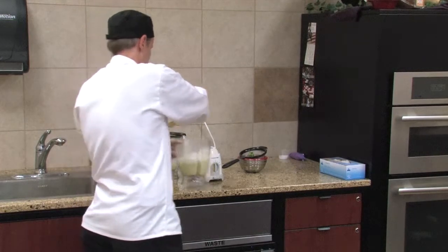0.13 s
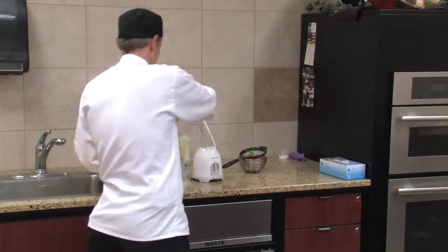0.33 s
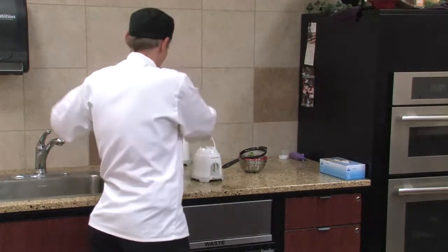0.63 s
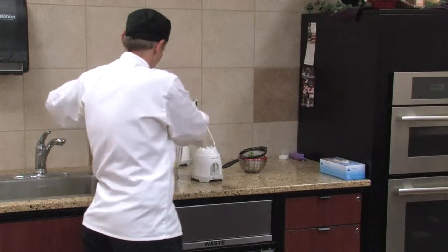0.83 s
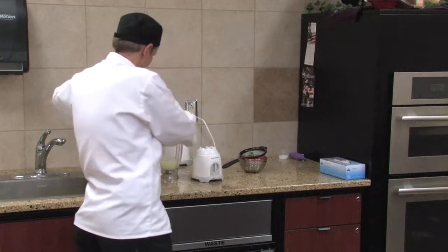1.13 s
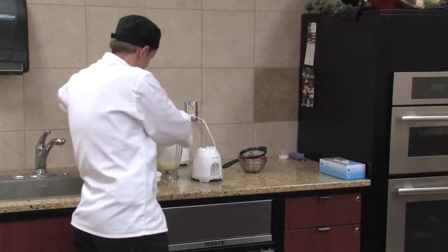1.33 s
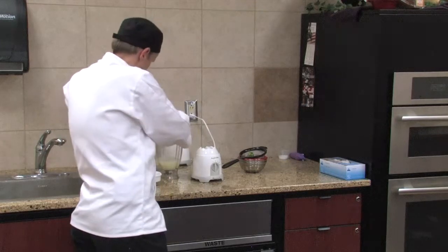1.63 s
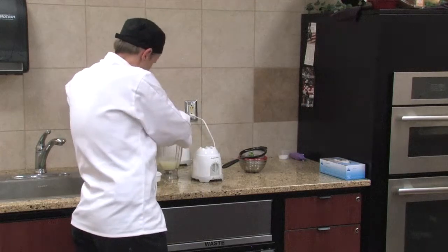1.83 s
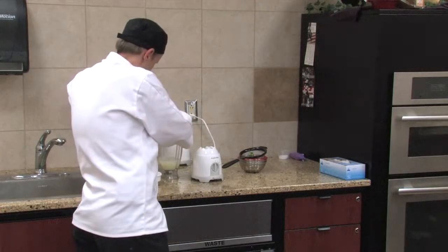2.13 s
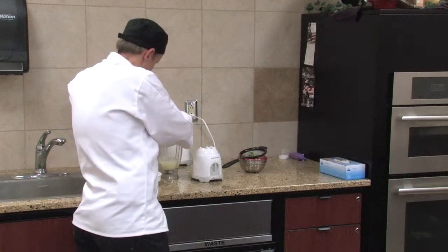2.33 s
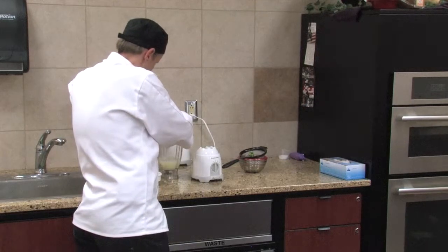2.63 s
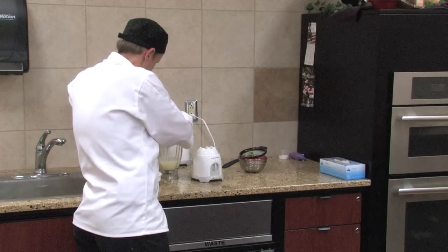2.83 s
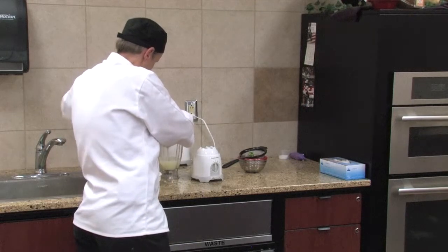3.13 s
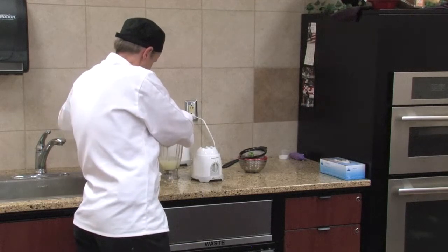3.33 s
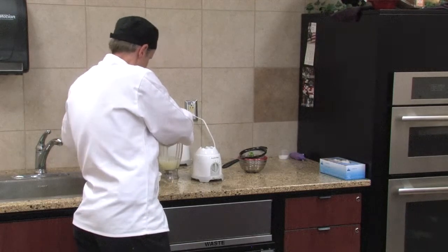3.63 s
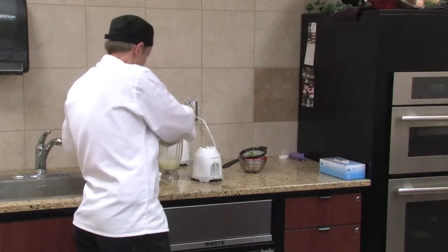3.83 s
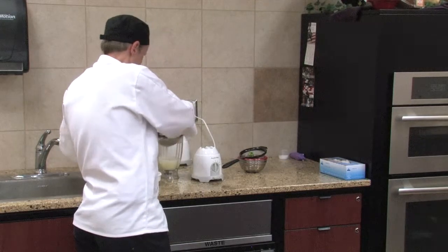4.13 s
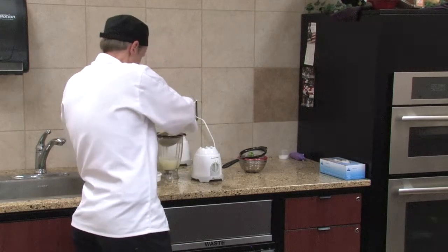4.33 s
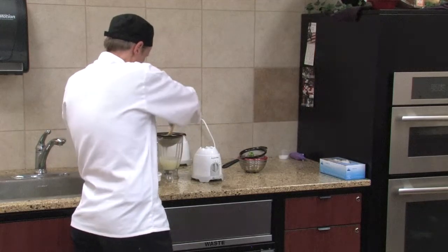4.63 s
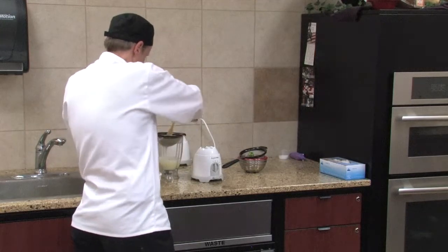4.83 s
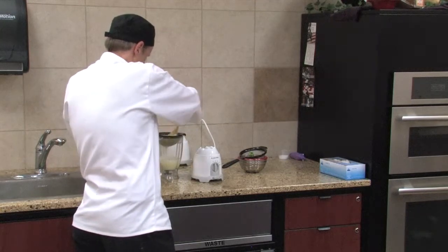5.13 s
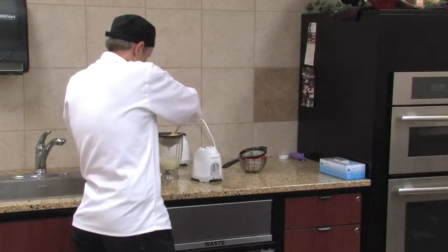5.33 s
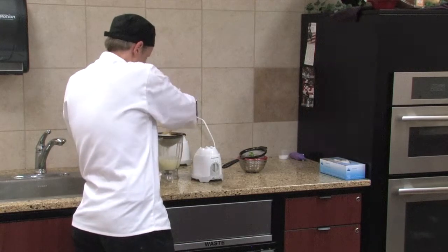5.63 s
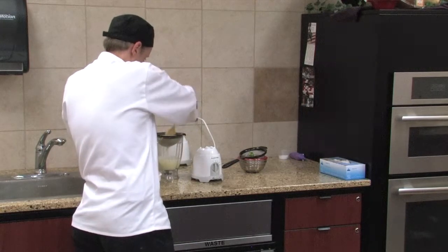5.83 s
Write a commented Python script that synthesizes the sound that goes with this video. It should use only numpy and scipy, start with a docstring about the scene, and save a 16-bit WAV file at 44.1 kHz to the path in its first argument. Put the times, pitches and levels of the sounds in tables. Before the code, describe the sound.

A small, hard kitchen with steady low ventilation and faint mains-like hum, heard from a few steps away. A faint wet rub and a small plop open it, near 0.15 s. From 0.66 to 1.0 s a glass jar knocks hollowly in an uneven, quick cluster, with one brighter click near 0.9. At 1.7 pulpy liquid hits mesh with fine crackle and wet snaps; from about 2.2 juice gurgles into the jar, its hollow note sinking, with plops until 2.8, then it dies away. A weak double knock comes near 3.05 and faint taps around 3.6-3.8. At 3.87 a heavy vessel lands on stone with a full thud and small rocking repeats; at 4.0 the sieve knocks onto the rim, followed by tiny wet ticks near 4.1. Until 6 s the sieve is worked with irregular soft, dull taps, strongest near 4.54, amid wet rubbing and tiny drips. Short tiled reverberation follows each sound.

```python
"""Blender jar and sieve in a kitchen

A glass jar knocks hollowly: each blow is a noise crack exciting decaying modes. Pulpy liquid trickles in,
its noise modulating the jar's sinking air note, with grains for crackle and rising sines for bubbles.
A vessel lands on stone and a sieve drops on the rim, modal blows again; the sieve is then worked with
soft taps (noise bursts) while it drips. Decaying noise tails give the hard room, over ventilation and hum."""
import sys
import numpy as np
from scipy import signal
from scipy.fft import rfft, irfft, next_fast_len
from scipy.io import wavfile
from scipy.ndimage import map_coordinates

SR = 44100
rng = np.random.default_rng(int(sys.argv[2]) if len(sys.argv) > 2 else 0)


def unload_wav(signal):
    """Save mono or channel-first audio to the path in sys.argv[1] as 16-bit WAV at rate SR, clipped to [-1, 1]."""
    wavfile.write(
        sys.argv[1],
        SR,
        np.round(np.clip(np.atleast_2d(signal).T, -1, 1) * 32767).astype(np.int16),
    )


N = 264578

# Soft taps in the sieve. Each row: start in seconds, level in dB, centre in Hz.
TAPS = [(.150, -49, 1100), (.259, -54, 836), (2.074, -47.5, 2220), (2.543, -46, 800), (2.587, -50, 700),
        (2.748, -50, 840), (3.593, -50, 1140), (3.653, -51, 1400), (3.748, -46.5, 1120),
        (3.798, -46.5, 1180), (4.294, -44.5, 1500), (4.493, -48, 1490), (4.544, -37.5, 1600),
        (4.653, -54, 1800), (4.738, -44.5, 2160), (4.903, -46.5, 2280), (5.189, -48.5, 1820),
        (5.394, -43.5, 1490), (5.478, -43, 1270), (5.501, -43.5, 1370), (5.657, -45, 1150),
        (5.847, -41.5, 1400)]
# Contact noise of heavy blows. Each row: frequency in Hz, relative density in dB per Hz.
THUD_SPECTRUM = [(70, -1), (130, 7.5), (200, 6), (400, 14), (800, 5.5), (1100, -7), (2000, -7.5),
                 (3000, -7), (4200, -10), (6000, -4.5), (10000, -12), (16000, -7)]


def amp(db):
    """Level to amplitude: 20 dB is a factor of ten."""
    return 10 ** (np.asarray(db) / 20)


def unit(x):
    """Power normalisation: scale to rms 1."""
    return x / np.sqrt(np.mean(x ** 2) + 1e-20)


def seconds(size):
    """Sampling: the time of each sample in seconds."""
    return np.arange(size) / SR


def fade(t, t60):
    """Exponential damping: 60 dB of decay in t60 seconds."""
    return np.exp(-np.log(1000) * t / t60)


def along(points, hz):
    """Logarithmic frequency scale: (Hz, value) points interpolated along it."""
    f, v = np.transpose(points)
    return np.interp(np.log(hz + 1), np.log(f + 1), v)


def wobble(rate):
    """Slow random modulation: a smooth curve through rate random knots a second."""
    knots = rng.standard_normal(int(N * rate / SR) + 4)
    return map_coordinates(knots, [seconds(N) * rate])


def filtered(x, response):
    """Linear filtering: the spectrum of x times a response of frequency."""
    m = next_fast_len(len(x) + 8192)
    return irfft(rfft(x, m) * response(np.fft.rfftfreq(m, 1 / SR)), m)[:len(x)]


def coloured(x, spectrum):
    """Spectral shaping: x weighted by a spectrum, at rms 1."""
    return unit(filtered(x, lambda hz: amp(along(spectrum, hz))))


def band(size, centre_hz, octaves):
    """Band-limited noise: a bell on the octave scale around a centre, at rms 1."""
    bell = lambda hz: np.exp(-.5 * (np.log2((hz + 1) / centre_hz) / octaves) ** 2)
    return unit(filtered(rng.standard_normal(size), bell))


def dying(x, life):
    """Frequency-dependent damping: each band of x decays with its own t60."""
    hz, t, z = signal.stft(x, SR, nperseg=128)
    decay = fade(t, along(life, hz)[:, None])
    return signal.istft(z * decay, SR, nperseg=128)[1][:len(x)]


def add(track, s, sound):
    """Superposition: mix a sound into the track at s seconds."""
    part = track[round(s * SR):][:len(sound)]
    part += sound[:len(part)]


def background(air_db, waver):
    """Broadband ventilation noise and tonal appliance hum, its level and phase slowly modulated."""
    # Air spectrum. Each row: frequency in Hz, relative density in dB per Hz.
    air = [(15, -69), (25, -79), (43, -4), (102, -3), (263, -12.5), (373, -14), (427, -19), (677, -23.5),
           (734, -25), (1130, -33.5), (1330, -37), (2350, -38.5), (3250, -42), (3820, -41), (16000, -47)]
    # Appliance hum. Each row: frequency in Hz, rms level in dB about which it wavers.
    hum_tones = [(58, -57.5), (118, -70)]
    hum = np.zeros(N)
    for hz, db in hum_tones:
        level = amp(db + 2.2 * wobble(4.5))
        phase = 2 * np.pi * hz * seconds(N) + waver * wobble(4.2)
        hum += level * np.sqrt(2) * np.sin(phase)
    return amp(air_db) * coloured(rng.standard_normal(N), air) + hum


def gesture(start, end, attack, release_db_per_s):
    """Attack and release: gain rises linearly, holds until the end and decays exponentially."""
    t = seconds(N)
    return np.clip((t - start) / attack, 0, 1) * amp(-release_db_per_s * np.maximum(t - end, 0))


def efforts():
    """Sum of powers: pour, loaded mesh and strokes set the gains of crackle, rub and jar cavity."""
    # Handling strokes. Each row: start and length in seconds, then crackle, rub and jar cavity level in dB.
    strokes = [(0.0, .15, -67, -64, -77), (4.075, 0.068, -67.5, -62, -69), (4.468, 0.1, -68.5, -59, -64),
               (5.144, .34, -75, -62.5, -63), (5.756, 0.035, -67, -59, -64)]
    # pulp hits the mesh at once and thins out; its juice needs a moment to run through
    start_s, end_s, soak_s = 1.705, 2.66, 0.46
    pulp_attack_s, juice_attack_s, stroke_attack_s = 0.007, 0.11, 0.018
    sag_db_per_s, pulp_release_db_per_s, juice_release_db_per_s = 2.5, 15.5, 34
    brisk_release_db_per_s, lingering_release_db_per_s = 53, 30

    since = seconds(N) - start_s
    thinning = amp(-sag_db_per_s * np.maximum(since, 0))
    pulp = thinning * gesture(start_s, end_s, pulp_attack_s, pulp_release_db_per_s)
    soaking = gesture(start_s, end_s, soak_s + juice_attack_s, pulp_release_db_per_s)
    juice = gesture(start_s + soak_s, end_s, juice_attack_s, juice_release_db_per_s)

    # the wet mesh never quite rests once it is loaded
    loaded = since > 0
    crackle = np.hypot(amp(-66) * pulp, amp(-83.5) * loaded)
    rub = np.hypot(amp(-64.5) * soaking, amp(-69.5) * loaded)
    cavity = np.hypot(amp(-55) * juice, amp(-75.5) * loaded)
    for s, length, crackle_db, rub_db, cavity_db in strokes:
        brisk = gesture(s, s + length, stroke_attack_s, brisk_release_db_per_s)
        lingering = gesture(s, s + length, stroke_attack_s, lingering_release_db_per_s)
        crackle = np.hypot(crackle, amp(crackle_db) * brisk)
        rub = np.hypot(rub, amp(rub_db) * lingering)
        cavity = np.hypot(cavity, amp(cavity_db) * brisk)
    return crackle, rub, cavity


def grains(rate, spread_db, t60):
    """Shot noise: bursts of unequal size at random times, rate a second, at rms 1."""
    starts = rng.random(N) < rate / SR
    sizes = amp(spread_db * np.clip(rng.standard_normal(N), -2, 2))
    power = signal.fftconvolve(starts * sizes ** 2, fade(seconds(SR // 10), t60) ** 2)[:N]
    return unit(np.sqrt(np.abs(power)) * rng.standard_normal(N))


def bubble(hz, glide=0.039, t60=0.057, splash_db=-6):
    """Bubble resonance: a small splash rings a bubble whose pitch climbs as it surfaces."""
    t = seconds(SR // 12)
    pitch_hz = hz * (1 + glide * rng.uniform(0.24, 0.86) * (1 - np.exp(-t / 0.033)))
    ring = np.sin(2 * np.pi * np.cumsum(pitch_hz) / SR)
    splash = amp(splash_db) * band(len(t), hz, octaves=.25)
    return (ring + splash) * (1 - np.exp(-t / .0018)) * fade(t, t60)


def bubbling(centre_hz, octaves, count):
    """Superposed resonators: scattered small bubbles, heavily damped by the pulp, at rms 1."""
    out = np.zeros(N)
    for slot in range(count):
        hz = centre_hz * 2 ** (octaves * rng.uniform(-1.3, 1))
        pop = amp(rng.normal(0, 3)) * bubble(hz, t60=.025, splash_db=0)
        add(out, (slot + rng.random()) / count * N / SR, pop)
    return unit(out)


def straining(crackle_gain, rub_gain):
    """Granular excitation: wet pulp crackles and fizzes; the stirred mesh rubs, bubbles and sheds droplets."""
    # Each row of both spectra: frequency in Hz, relative density in dB per Hz.
    crackle_spectrum = [(800, -9), (2000, 7), (3500, 8), (7000, 9.5), (10000, 1.5), (15000, -5.5)]
    rub_spectrum = [(250, -16.5), (420, 11), (570, -4.5), (700, 7.5), (820, -2.5), (1050, -4.5),
                    (1600, -10), (2300, -39), (3500, -19.5), (6000, -29)]
    crackle = coloured(grains(rate=220, spread_db=4.5, t60=0.027), crackle_spectrum)
    fizz = bubbling(centre_hz=5680, octaves=0.61, count=300)
    rub = coloured(grains(rate=250, spread_db=2.5, t60=.03), rub_spectrum)
    gurgle = bubbling(centre_hz=1310, octaves=0.65, count=280)
    droplets = bubbling(centre_hz=3404, octaves=0.064, count=110)  # small drops of nearly one size
    pulp = crackle + amp(-8) * fizz
    mesh = rub + amp(-10) * gurgle + amp(-15) * droplets
    return crackle_gain * pulp + rub_gain * mesh


def cavity_hz(s):
    """Cavity resonance: the jar's air note sinks as pulp covers its mouth."""
    open_hz, covered_hz = 522, 419
    half_covered_s, covering_s = 2.3, 0.1412
    return covered_hz + (open_hz - covered_hz) / (1 + np.exp((s - half_covered_s) / covering_s))


def pour(gain, width_hz):
    """Randomly driven resonance: splashing noise, modulated onto the air note, keeps the cavity gurgling."""
    phase = 2 * np.pi * np.cumsum(cavity_hz(seconds(N))) / SR
    lowpass = lambda hz: 1 / (1 + (hz / width_hz) ** 2)
    splashing = lambda: filtered(rng.standard_normal(N), lowpass)
    gurgling = splashing() * np.sin(phase) + splashing() * np.cos(phase)
    lumps = amp(3 * np.clip(wobble(28), -2, 1))  # the juice falls unevenly
    return gain * unit(lumps * gurgling)


def touches(rows, octaves, rise, t60):
    """Overdamped contact: short noise bursts around their own pitch, too damped to ring."""
    out, t = np.zeros(N), seconds(SR // 6)
    for s, db, hz in rows:
        envelope = (1 - np.exp(-t / rise)) * fade(t, t60)
        add(out, s, amp(db) * band(len(t), hz, octaves) * envelope)
    return out


def wet_ticks():
    """Impulsive contact: tiny wet snaps and wire ticks, very short noise bursts."""
    # Each row: start in seconds, level in dB, centre in Hz.
    snaps = [(.122, -56, 7800), (.599, -56, 7850), (1.372, -52.5, 13100), (1.720, -49.5, 4950),
             (1.864, -52, 8250), (1.933, -47, 10300), (2.082, -45.5, 7670), (2.553, -56, 6900),
             (2.789, -50, 5500), (4.1063, -43.5, 10100), (4.1417, -42, 11700), (4.235, -56.5, 2410)]
    return touches(snaps, octaves=0.83, rise=0.00026, t60=0.012)


def drips():
    """Bubble and cavity resonance: larger drops trap bubbles; lumps and taps ring the jar's air."""
    # Drops that trap a bubble. Each row: start in seconds, level in dB, starting pitch in Hz.
    drops = [(.130, -56, 3590), (.152, -40.5, 660), (2.074, -48.5, 1490), (2.079, -49.5, 3350),
             (2.49, -52.5, 1670), (2.539, -45, 1010), (2.61, -49.5, 1540), (2.773, -52, 1515),
             (3.223, -57.5, 3460), (4.508, -52, 3450), (4.572, -54, 3530), (4.68, -58, 1650),
             (5.161, -55, 3380), (5.229, -53.5, 3450), (5.263, -56, 3410), (5.286, -59, 3450)]
    # Lumps that plop into the jar. Each row: start in seconds, level in dB.
    plops = [(2.076, -52), (2.210, -43.5), (2.255, -45), (2.459, -44), (2.546, -43.5), (2.588, -37.5),
             (2.750, -42.5), (2.796, -41.5)]
    out = np.zeros(N)
    for s, db, hz in drops:
        add(out, s, amp(db) * bubble(hz))
    for s, db in plops:
        add(out, s, amp(db) * bubble(cavity_hz(s), t60=0.062))
    for s, db, _ in TAPS:
        add(out, s, amp(db) * bubble(cavity_hz(s), t60=0.064))
    return out


def pats(rub_gain, count):
    """Random impacts: faint (s, dB, centre Hz) pats of pulp, as strong as the mesh is being worked."""
    s = (np.arange(count) + rng.random(count)) / count * (N - 1) / SR
    rub_db = 20 * np.log10(np.interp(s, seconds(N), rub_gain) + 1e-9)
    db = rub_db + 9 + 5 * np.clip(rng.standard_normal(count), -2, 1)
    hz = 1500 * 2 ** rng.uniform(-.5, 0.55, count)
    return list(zip(s, db, hz))


def soft_taps(rub_gain):
    """Cushioned contact: the pulp in the sieve acts as a lowpass that dulls each tap and pat."""
    cushion_hz = 1110
    taps = touches(TAPS + pats(rub_gain, count=75), octaves=0.91, rise=0.0014, t60=0.042)
    return filtered(taps, lambda hz: 1 / np.sqrt(1 + (hz / cushion_hz) ** 2))


def blows(rows, modes, crack, swell, crack_db):
    """Modal excitation: each contact cracks and rings the object; a softer one has less treble."""
    # Decay of the contact noise. Each row: frequency in Hz, t60 in seconds.
    crack_life = [(300, 0.12), (700, 0.16), (1500, 0.099), (4000, 0.054), (12000, 0.027)]
    out, t = np.zeros(N), seconds(SR // 3)
    for s, click_db, body_db, bright_hz, ratio in rows:
        soft = lambda hz: 1 / np.sqrt(1 + (hz / bright_hz) ** 4)
        contact = lambda hz: amp(along(crack, hz)) * soft(hz)
        grit = unit(filtered(rng.standard_normal(len(t)), contact))
        sound = amp(click_db + crack_db) * dying(grit, crack_life) * (1 - np.exp(-t / .0004))
        for k, (hz, db, t60) in enumerate(modes):
            if hz < 1000:
                # the body builds up over a few cycles; grip and a covered mouth shift its pitch
                strength = amp(body_db + db + rng.normal(0, 1)) * (1 - np.exp(-(t / swell) ** 2))
                phase = 2 * np.pi * hz * ratio * t
            else:
                # wall modes depend on where the contact falls, and its chatter blurs them
                level = amp(click_db + db + rng.normal(0, 2))
                strength = level * soft(hz) * (1 - np.exp(-t / .001))
                phase = 2 * np.pi * hz * np.cumsum(1 + rng.normal(0, .22, len(t))) / SR
            sound += (-1) ** k * strength * np.sin(phase) * fade(t, t60)
        add(out, s, sound)
    return out


def jar_knocks():
    """Modal excitation of the hollow jar: its air cavity and glass walls ring together."""
    # Each row: start in seconds, relative click and body levels in dB, contact brightness in Hz,
    # body pitch as a ratio.
    knocks = [(.6600, -32.5, -21, 3900, 0.96), (.7655, -28, -21, 3540, 0.91), (.7945, -45, -30, 3500, 0.8),
              (.8114, -31, -18.5, 4070, 1), (.9148, -25.5, -28, 10000, 0.95),
              (.9300, -43, -26.5, 4000, 0.94), (.9493, -32.5, -26, 3630, 1),
              (.9700, -45, -34.5, 3500, 0.86), (.9870, -46, -37, 3200, 0.94), (3.0412, -32.5, -32, 1910, 1),
              (3.0597, -37, -31, 9900, 0.8), (3.0700, -68, -30.5, 2480, 0.70)]
    # Cavity and wall modes. Each row: frequency in Hz, relative level in dB, t60 in seconds.
    modes = [(400, -16, .06), (462, -11, .05), (507, 1.5, .08), (802, -18, .05), (1305, -10, .05),
             (1540, -11, .04), (1680, -8, .05), (2510, -10, .03), (2890, -12, .04), (3230, -9, .035),
             (3620, -7, .04), (3850, -9, .03), (4330, -14, .04)]
    # Contact noise of glass. Each row: frequency in Hz, relative density in dB per Hz.
    crack = [(150, 1.5), (500, 12), (1050, 0), (1600, 3), (2100, -2), (3500, -5), (4500, 2), (8000, -2.5),
             (10000, -3.5), (16000, -14)]
    return blows(knocks, modes, crack, swell=0.0034, crack_db=-4.5)


def landing():
    """Coupled modes: the vessel's base lands on the counter and rocks, ringing both."""
    # Each row: start in seconds, relative click and body levels in dB, contact brightness in Hz,
    # body pitch as a ratio.
    contacts = [(3.8695, -18.5, -22, 3740, 0.99), (3.9068, -26.5, -26.5, 3800, 0.97),
                (3.9290, -35, -33, 3100, 0.94)]
    # Base and counter modes. Each row: frequency in Hz, relative level in dB, t60 in seconds.
    modes = [(90, -9.5, 0.24), (119.7, -4.5, 0.18), (164, -4, 0.084), (244, -5, 0.057), (281, 1, 0.079),
             (423, 5.5, 0.075), (512, -7, 0.11), (617, -0.5, 0.075), (815, 0, 0.078), (920, -6.5, 0.075),
             (1284, -9.5, 0.054), (1680, -16, 0.048), (1910, -20.5, 0.075), (2460, -30, .06),
             (3036, -11, 0.034)]
    return blows(contacts, modes, THUD_SPECTRUM, swell=0.0032, crack_db=-4)


def rim_knocks():
    """Modal excitation of the sieve as it meets the jar's rim."""
    # Each row: start in seconds, relative click and body levels in dB, contact brightness in Hz,
    # body pitch as a ratio.
    contacts = [(4.0016, -28, -19.5, 6400, 1), (4.0095, -30, -20.5, 2870, 1),
                (4.0205, -39, -34.5, 2000, 0.92)]
    # Modes of the sieve on the rim. Each row: frequency in Hz, relative level in dB, t60 in seconds.
    modes = [(160.5, -10, 0.055), (316, 0.5, 0.15), (382, -6, 0.11), (415, -18, 0.079), (469, -1, 0.1),
             (618, 3.5, .065), (720, -18, 0.08), (1290, -6, 0.03), (2390, -6.5, 0.041), (3020, -8, 0.031),
             (4000, -24, 0.06), (5260, -18, 0.052)]
    return blows(contacts, modes, THUD_SPECTRUM, swell=0.0038, crack_db=-0.5)


def kitchen(x, wet_db, gap):
    """Diffuse reverberation of tiles and cabinets: a fresh decaying noise tail every quarter second."""
    # Reverberation. Each row: frequency in Hz, t60 in seconds.
    room_life = [(100, 1), (330, 0.72), (650, 0.12), (1500, 0.38), (4000, 0.28), (12000, 0.33)]
    out, t = np.zeros(N), seconds(SR * 3 // 4)
    for start in range(0, N, SR // 4):
        buildup = 1 - np.exp(-(t / gap) ** 2)
        tail = dying(rng.standard_normal(len(t)), room_life) * buildup
        add(out, start / SR, signal.fftconvolve(x[start:start + SR // 4], tail / np.linalg.norm(tail)))
    return amp(wet_db) * out


def scene():
    """Superposition: all the handling and its room reverberation, over the background."""
    crackle, rub, cavity = efforts()
    liquid = straining(crackle, rub) + pour(cavity, width_hz=32) + drips()
    contacts = wet_ticks() + soft_taps(rub)
    knocks = jar_knocks() + landing() + rim_knocks()
    near = liquid + contacts + knocks
    room = kitchen(near, wet_db=-17, gap=0.017)
    return (near + room + background(air_db=-53.5, waver=0.54))[None]


def record(dry):
    """Band limitation: nothing is kept from 15850 Hz upwards."""
    return filtered(dry[0], lambda hz: hz < 15850)[None]


dry = scene()
out = record(dry)
unload_wav(out)
```